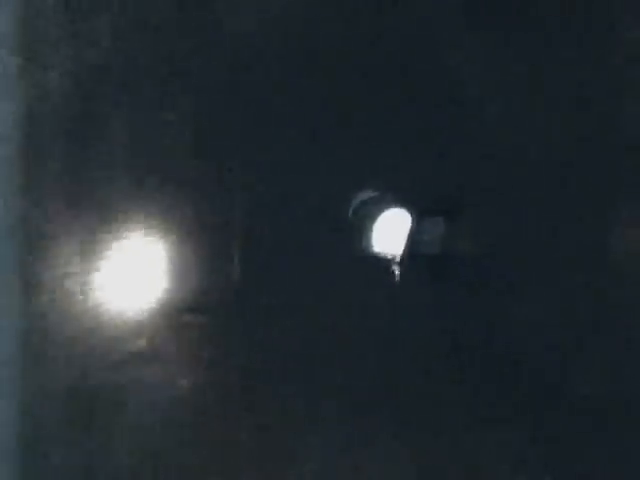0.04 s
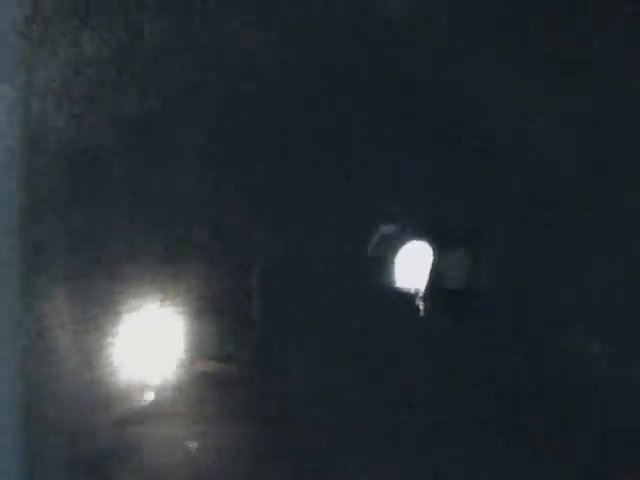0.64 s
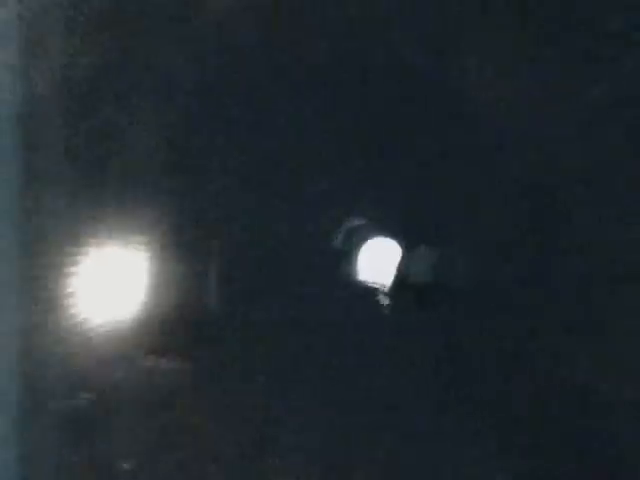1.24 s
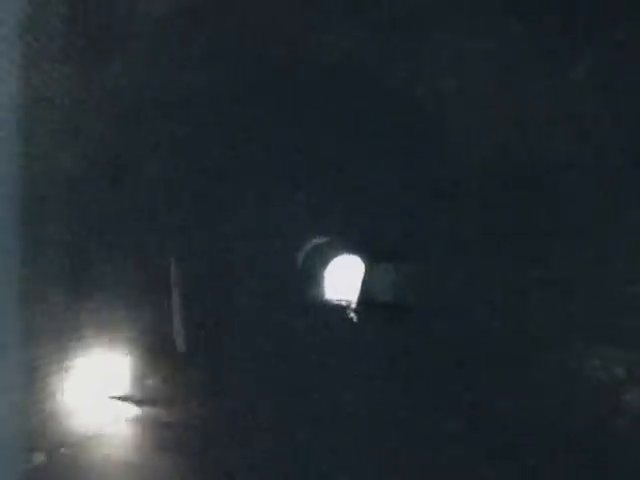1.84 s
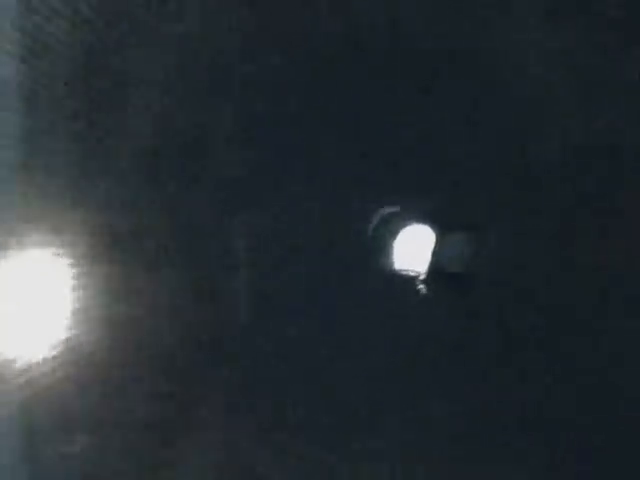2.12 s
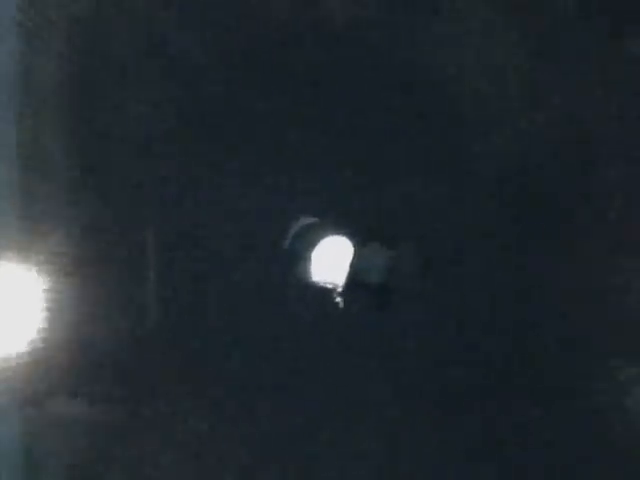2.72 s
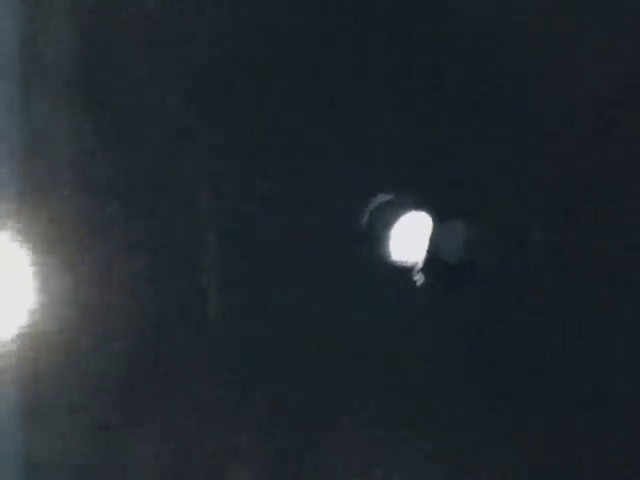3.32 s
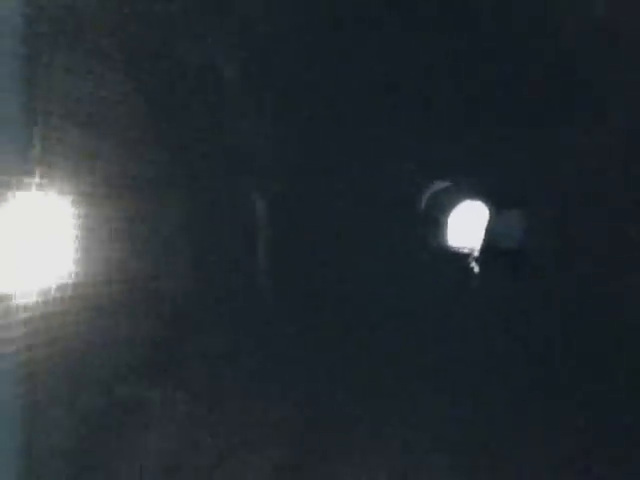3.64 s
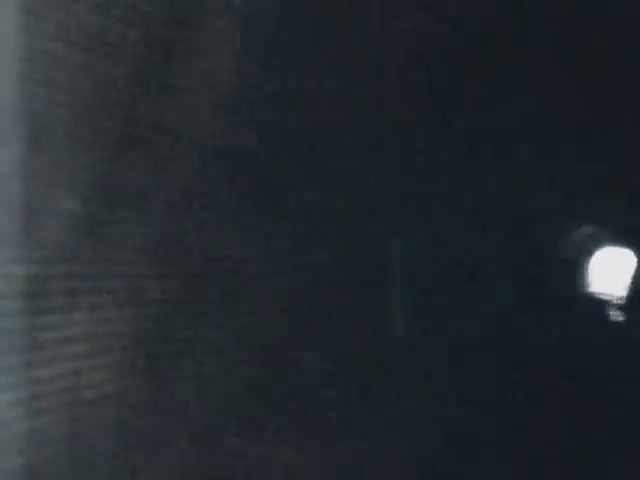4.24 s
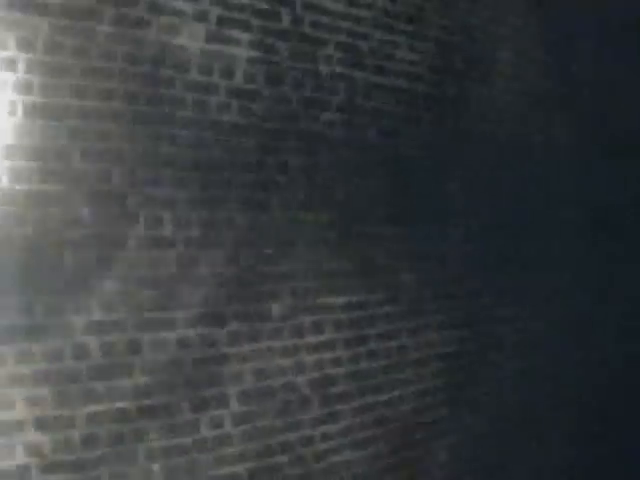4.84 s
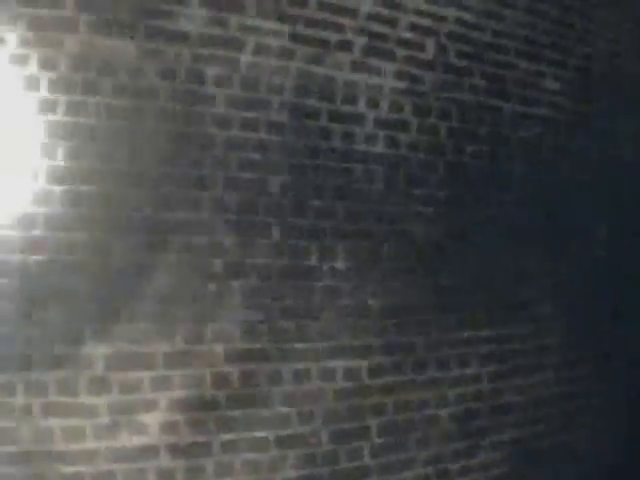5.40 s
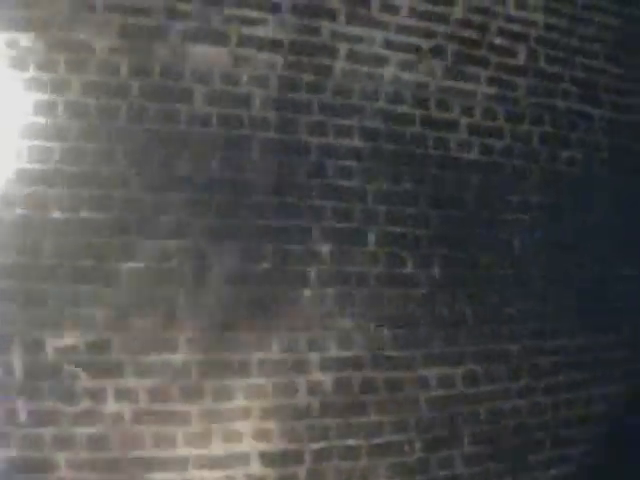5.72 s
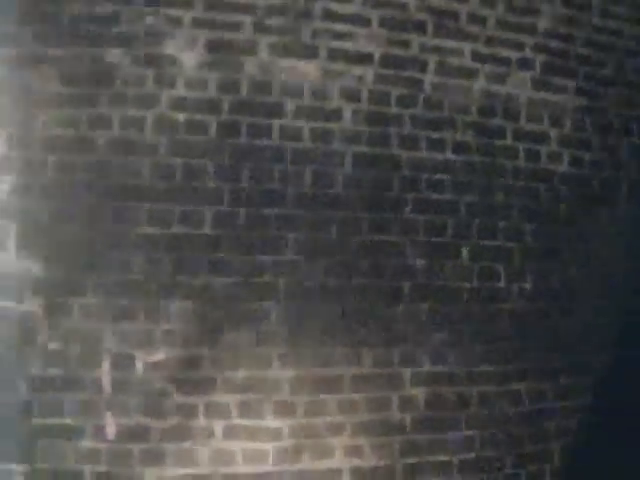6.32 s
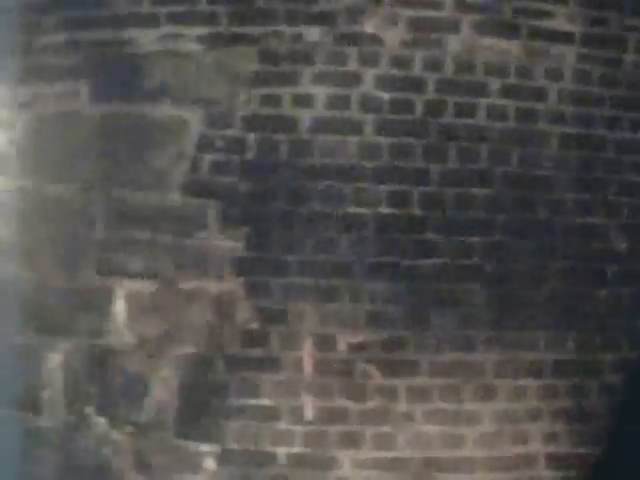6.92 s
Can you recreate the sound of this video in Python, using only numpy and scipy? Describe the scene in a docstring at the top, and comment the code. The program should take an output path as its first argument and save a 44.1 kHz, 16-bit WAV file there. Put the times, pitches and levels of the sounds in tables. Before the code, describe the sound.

Crunchy footsteps on loose stones echo in a hollow brick tunnel, then stop and give way to faint shuffles.

```python
"""In a long brick tunnel, someone walks over loose stones, then stops and shuffles on the spot.
Each step grinds grit, knocks stones together and thumps the ground. Now and then a brick rocks or a
shard rings; dull tocks and the clack of loose carried gear recur with the walk. The arched roof
answers with a hollow echo, over a faint draught and a camera's hiss and thin whine."""
import sys
import numpy as np
from scipy import signal
from scipy.fft import rfft, irfft, next_fast_len
from scipy.io import wavfile
from scipy.ndimage import map_coordinates

SR = 44100
rng = np.random.default_rng(int(sys.argv[2]) if len(sys.argv) > 2 else 0)


def bounce(signal):
    """Save signal as a 16-bit WAV file at the path given by the first command-line argument."""
    frames = np.transpose(np.atleast_2d(signal))
    limited = np.clip(frames, -1, 1)
    pcm = np.round(limited * 32767).astype(np.int16)
    wavfile.write(sys.argv[1], SR, pcm)


N = 311346
TOP_HZ = 12850

# Levels compare rows within a table. A fade_s is the time to die away by 60 dB.
# tone of the draught and hiss: pitch_hz, level_db
DRAUGHT_TONE = [(25, -65), (95, -20), (240, -21), (390, -14), (800, -7), (1700, -8), (3400, -11.5),
                (8000, -19), (13000, -23.5)]
# whine of the camera's electronics: pitch_hz, level_db
WHINE = [(8118, -78.5), (8146, -79), (11799, -83)]
# how long the tunnel echoes: pitch_hz, fade_s
ECHO_FADES = [(150, 7.8), (800, 1.46), (2000, 0.8), (4000, 1.64), (12000, 0.47)]
# how strongly the walls reflect: pitch_hz, level_db
WALL_TONE = [(100, -37), (400, -9.5), (800, -5), (2000, -5), (4000, -6.5), (12000, 0)]
# faint clinks far down the tunnel: start_s, level_db, pitch_hz
CLINKS = [(5.548, -35, 1663), (5.776, -38, 1610)]
# clacks of the loose gear: start_s, level_db
CLACKS = [(1.174, -13), (1.839, -11), (2.42, -10.5), (3.107, -14.5), (3.784, -11), (4.458, -19.5)]
# notes the gear rings with: pitch_hz, level_db, fade_s
GEAR_NOTES = [(800, -3, 0.013), (1758, -1.5, 0.0095), (1738, 3.5, 0.016), (2028, 1.5, 0.02),
              (2480, -1, 0.0093), (3670, -3, 0.0064)]
# sprays of fine sand: start_s, level_db, length_s
SPRAYS = [(.205, -49.5, 0.012), (0.997, -43.5, 0.0084), (4.948, -58.5, 0.014), (5.789, -58.5, 0.0098)]
# thin hiss of that sand: pitch_hz, level_db
SAND_TONE = [(1500, -24), (4000, 3.5), (5500, 0.5), (8000, -7), (13000, -12)]
# weight landing on the ground: start_s, level_db
THUMPS = [(0.47, -43), (.652, -40.5), (1.038, -26), (1.208, -24.5), (1.779, -33), (1.798, -29),
          (2.399, -36), (3.494, -39), (4.618, -44), (5.11, -47.5), (5.369, -56), (5.445, -51.5),
          (6.161, -52), (6.581, -50), (6.989, -47.5)]
# dull tone of a sole on the ground: pitch_hz, level_db
SOLE_TONE = [(30, -27), (90, -14.5), (140, -11), (200, 1), (285, -1), (350, 5), (480, -2.5), (900, -5.5),
             (2000, -64)]
# loose bricks rocking: start_s, level_db, lowest_pitch_hz
BRICKS = [(4.271, -20, 809), (4.313, -25.5, 778), (4.461, -25, 664)]
# notes of a brick: times_lowest_pitch, level_db, fade_s
BRICK_NOTES = [(1, 2.5, 0.049), (1.78, -2.5, 0.048), (1.92, -1.5, 0.072), (3.1, -8, 0.017)]
# bright crack of a hard blow: pitch_hz, level_db
CRACK_TONE = [(100, -36), (400, -26), (1200, 0), (2400, 1.5), (3600, -0.5), (4700, -10.5), (7500, -17),
              (13000, -22)]
# hard, flat shards struck underfoot: start_s, level_db, rattle_s
SHARDS = [(1.136, -8, 0.016), (2.992, -8.5, 0.024), (3.582, -10, 0.027), (3.606, -16, 0.051),
          (4.314, -11, .04)]
# notes of a shard: pitch_hz, level_db, fade_s
SHARD_NOTES = [(1370, 14.5, 0.051), (2080, 7.5, 0.047), (2420, 10, 0.024), (3300, 0, 0.035),
               (3760, -1, 0.031), (5050, -14, 0.03)]
# grit snapping close by: start_s, level_db
SNAPS = [(0.517, -15.5), (0.59, -17.5), (.745, -27), (.767, -19.5), (1.009, -25), (1.182, -15),
         (1.199, -21), (1.208, -7), (1.708, -13), (1.803, -15), (1.945, -16), (1.99, -25), (2.365, -18.5),
         (2.399, -24), (2.411, -13), (3.005, -22), (3.231, -18), (3.495, -16), (3.745, -18.5), (3.799, -16),
         (4.405, -25.5), (4.577, -19), (4.659, -20.5), (5.11, -28.5), (5.116, -23.5)]
# tone of a snap: pitch_hz, level_db
SNAP_TONE = [(30, -7), (110, -47), (200, -1), (500, -2.5), (1100, 4.5), (2600, 6), (4500, -6), (7000, -14),
             (13000, -23)]
# dull, hollow tocks close by, recurring with the stride: start_s, level_db
TOCKS = [(.169, -15.5), (0.4425, -20), (.561, -13), (.571, -18), (0.7544, -12), (1.109, -15.5),
         (1.321, -18.5), (1.633, -24), (1.763, -15), (2.178, -27), (2.375, -14), (2.575, -29), (3.214, -13),
         (3.731, -12), (4.642, -20)]
# dull ring of a tock: pitch_hz, level_db
TOCK_TONE = [(150, -27), (500, -28), (820, 1.5), (1500, 1), (2100, -16), (6000, -36.5)]
# loose stones knocking together: start_s, level_db, pitch_hz, rattle_s, crack_db
KNOCKS = [(0.468, -27.5, 1130, 0.013, -4), (0.579, -16, 1370, 0.041, -6.5), (0.621, -14.5, 1700, .018, -24),
          (0.633, -18, 1280, 0.013, -17), (.835, -22, 1610, 0.055, -12), (1.038, -8, 960, 0.0081, -8.5),
          (1.098, -9.5, 1290, 0.034, -16.5), (1.208, -11, 1430, 0.027, -5), (1.257, -23, 2730, 0.02, 4),
          (1.803, -16.5, 800, 0.022, -1.5), (1.83, -17.5, 1840, 0.026, -4), (1.864, -21, 2160, 0.016, -15),
          (1.894, -19, 710, .03, -18), (1.949, -16.5, 1030, 0.02, -18), (2.137, -29, 1410, 0.018, -23),
          (2.255, -35, 1670, .012, 5), (2.493, -22, 990, 0.0097, -1.5), (2.695, -33, 1870, 0.0096, -50),
          (2.811, -25.5, 1850, 0.011, -22), (3.143, -25.5, 890, .015, -4), (3.18, -21.5, 2010, 0.088, -15),
          (3.526, -24.5, 970, 0.052, -17), (3.843, -22, 1240, 0.04, -23), (3.951, -25, 1510, 0.042, -16),
          (4.126, -28, 1620, 0.011, -9), (4.151, -28.5, 1620, 0.022, -10), (4.239, -28, 1030, 0.03, -5.5),
          (4.321, -25.5, 1250, 0.085, -26), (4.848, -28, 994, 0.037, -11.5),
          (5.153, -28.5, 1340, 0.035, -15), (5.394, -36.5, 870, 0.016, -8), (5.546, -35.5, 1500, 0.021, -7),
          (6.160, -35.5, 1990, 0.025, -9), (6.582, -34, 1970, 0.048, -7), (6.607, -31.5, 1230, 0.025, -15),
          (6.686, -37.5, 970, .018, -6), (6.779, -40, 675, 0.05, -15), (6.99, -29.5, 2250, .03, -25)]
# footfalls about 0.6 s apart, then two shuffles: full_weight_s, grit_db, sole_db, rise_s, settle_s
STEPS = [(0.0, -33, -50, 0.13, 0.26), (0.575, -31, -49, 0.13, 0.18), (1.21, -31, -53, 0.23, 0.25),
         (1.795, -30, -46.5, 0.19, 0.25), (2.425, -35.5, -53, 0.13, 0.17), (3.009, -32, -48.5, 0.16, 0.29),
         (3.809, -34.5, -54, 0.12, 0.21), (4.34, -38, -81, 0.15, 0.3), (4.61, -39.5, -60, 0.19, 0.45),
         (6.52, -48, -72, 0.34, 0.18), (6.98, -49.5, -64.5, 0.22, 0.13)]
# gravel giving way as a heel lands or a toe pushes off: start_s, level_db, length_s
SLIDES = [(0.196, -41, 0.037), (0.342, -44, 0.2), (0.734, -41.5, 0.12), (0.896, -45, 0.096),
          (0.997, -38, 0.048), (1.125, -38.5, 0.08), (1.262, -36.5, 0.044), (1.385, -42, 0.063),
          (1.536, -43, 0.11), (1.92, -43.5, 0.082), (1.975, -45, 0.16), (2.367, -32.5, 0.0085),
          (2.52, -38, .02), (2.612, -40, 0.023), (2.794, -43, 0.024), (3.176, -43.5, 0.11),
          (3.3, -49, 0.17), (3.579, -40.5, 0.19), (3.947, -42, 0.059), (4.906, -51.5, 0.049)]
# grit trickling between steps, less once the walker stands: time_s, level_db
TRICKLE = [(0, -51), (4.2, -50), (5.2, -58), (5.95, -62), (7.05, -55)]
# tone of grinding gravel: pitch_hz, level_db
GRAVEL_TONE = [(50, -38), (120, -19.5), (300, -15), (370, -34), (470, -7.5), (650, -3.5), (860, -1),
               (1450, 1), (2600, -4), (4000, -16), (8000, -27.5), (13000, -31)]


def amp(db):
    """Turn decibels into a number to multiply by."""
    return 10 ** (np.asarray(db) / 20)


def unit(x):
    """Scale a sound to an average power of 1."""
    return x / np.sqrt(np.mean(x ** 2) + 1e-20)


def peaked(x):
    """Scale a sound so its biggest swing is 1."""
    return x / np.abs(x).max()


def along(points, hz):
    """Read a table of (pitch, value) rows at any pitch in between."""
    pitches, values = np.transpose(points)
    return np.interp(np.log(hz + 1), np.log(pitches), values)


def wobble(rate):
    """A smooth curve through `rate` random values a second."""
    return map_coordinates(rng.standard_normal(int(N * rate / SR) + 4), [np.arange(N) * rate / SR])


def add(track, start_s, sound):
    """Mix a sound into a track."""
    part = track[max(round(start_s * SR), 0):][:len(sound)]
    part += sound[:len(part)]


def click(tone, size=4096):
    """A click with the given tone."""
    cepstrum = irfft(np.log(amp(along(tone, np.fft.rfftfreq(size, 1 / SR)))))
    # folding the second half onto the first packs the energy at the click's start
    cepstrum[1:size // 2] *= 2
    cepstrum[size // 2 + 1:] = 0
    return irfft(np.exp(rfft(cepstrum)))


def coloured(x, tone):
    """Filter a sound to give it a tone."""
    return signal.fftconvolve(x, click(tone))[:len(x)]


def hiss(tone):
    """Steady noise with the given tone."""
    return unit(coloured(rng.standard_normal(N), tone))


def fade(t, fade_s):
    """Die away by 60 dB in fade_s."""
    return np.exp(-np.log(1000) * t / np.maximum(fade_s, 1e-4))


def rattle(t, rattle_s, bounces_per_s=2000):
    """One blow, then tiny bounces that die away."""
    bounces = rng.random(len(t)) < bounces_per_s / SR
    blows = amp(-8.5) * bounces * rng.standard_normal(len(t)) * fade(t, 1.8 * rattle_s)
    blows[0] = 1
    return blows


def slip(t, length_s, rise_s=0.0051, fall_s=0.017):
    """Loose ground starts to move at t = 0, runs for a while and comes to rest."""
    return np.exp(-np.maximum(np.maximum(-t / rise_s, (t - length_s) / fall_s), 0))


def grains(per_s, hz, spread, cycles, scatter_db, size=200):
    """Tiny stones tick at random times, pitches and strengths, each ringing for a few cycles."""
    count = int(per_s * N / SR)
    start = rng.integers(0, N, (count, 1))
    pitch = np.clip(hz * np.exp(spread * rng.standard_normal((count, 1))), hz / 2, TOP_HZ)
    strength = amp(scatter_db * np.minimum(rng.exponential(size=(count, 1)), 3))
    turns = pitch * np.arange(size) / SR
    ticks = strength * rng.choice([-1, 1], (count, 1)) * np.sin(2 * np.pi * turns) * fade(turns, cycles)
    track = np.bincount((start + np.arange(size)).ravel(), ticks.ravel(), N)[:N]
    # small stones give off hardly any bass
    return unit(signal.sosfilt(signal.butter(2, hz / 2, "high", fs=SR, output="sos"), track))


def draught_and_whine():
    """Faint moving air, with the camera's hiss and thin whine."""
    t = np.arange(N) / SR
    whine = sum(amp(db) * np.sin(2 * np.pi * hz * t + 0.4 * wobble(5)) for hz, db in WHINE)
    return amp(-61) * hiss(DRAUGHT_TONE) + whine


def tunnel_echo(sound, spots=6):
    """The bricks echo, the bass longest; one echo blends into the next as the walker moves along."""
    echo = np.zeros(N)
    for spot in range(spots):
        hz, t, bands = signal.stft(rng.standard_normal(SR), SR, nperseg=256)
        bands = bands * fade(t, along(ECHO_FADES, hz)[:, None]) * (1 - np.exp(-t / 0.0089))
        tail = signal.istft(bands, SR, nperseg=256)[1]
        tail = coloured(tail / np.linalg.norm(tail), WALL_TONE)
        nearness = np.maximum(1 - np.abs(np.linspace(0, spots - 1, N) - spot), 0)
        echo += signal.fftconvolve(sound * nearness, tail)[:N]
    return echo


def far_clinks():
    """Far away, a small stone gives a soft, short ring."""
    out, t = np.zeros(N), np.arange(SR) / SR
    for start_s, db, hz in CLINKS:
        add(out, start_s, amp(db) * peaked(np.sin(2 * np.pi * hz * t) * t * fade(t, 0.009)))
    return out


def gear_clacks(size=4096):
    """The loose piece of gear strikes, then bounces once a few milliseconds later."""
    out, t = np.zeros(N), np.arange(size) / SR
    for start_s, db in CLACKS:
        ring = sum(amp(note_db + rng.normal()) * np.sin(2 * np.pi * hz * rng.normal(1, 0.012) * t)
                   * fade(t, fade_s) for hz, note_db, fade_s in GEAR_NOTES)
        clack = peaked(ring * (1 - np.exp(-t / 0.00057)))
        add(out, start_s, amp(db - 0.5) * clack)
        add(out, start_s + rng.uniform(0.00358, 0.0091), amp(db - 8) * clack)
    return out


def sand_sprays():
    """Fine sand skitters away from a boot."""
    t = np.arange(N) / SR
    flow = sum(amp(db) * slip(t - start_s, length_s) for start_s, db, length_s in SPRAYS)
    return flow * hiss(SAND_TONE)


def ground_thumps(size=4096):
    """The packed ground answers the walker's weight with a short, low push."""
    out, t = np.zeros(N), np.arange(size) / SR
    for start_s, db in THUMPS:
        thump = coloured(rng.standard_normal(size) * fade(t, 0.028), SOLE_TONE)
        add(out, start_s, amp(db + 5) * peaked(thump))
    return out


def rocking_bricks(size=8192):
    """A rocking brick rings hollow under a short crack."""
    out, t = np.zeros(N), np.arange(size) / SR
    for start_s, db, hz in BRICKS:
        ring = sum(amp(note_db + rng.normal()) * np.sin(2 * np.pi * (hz * ratio * t + rng.random()))
                   * fade(t, fade_s) for ratio, note_db, fade_s in BRICK_NOTES)
        ring *= 1 - np.exp(-t / 0.00087)  # soften the start
        crack = coloured(rng.standard_normal(size) * fade(t, 0.047), CRACK_TONE)
        add(out, start_s, amp(db + 1.5) * (peaked(ring) + amp(-7) * peaked(crack)))
    return out


def ringing_shards(size=4096):
    """A brittle shard snaps, sounds all its bright notes at once and chatters briefly."""
    out, t = np.zeros(N), np.arange(size) / SR
    crack = amp(6.5) * peaked(click(CRACK_TONE, size))
    for start_s, db, rattle_s in SHARDS:
        ring = sum(amp(note_db + rng.normal()) * np.sin(2 * np.pi * hz * rng.normal(1, 0.023) * t)
                   * fade(t, fade_s) for hz, note_db, fade_s in SHARD_NOTES)
        chatter = signal.fftconvolve(rattle(t, rattle_s), np.diff(ring, prepend=0))[:size]
        add(out, start_s, amp(db) * peaked(peaked(chatter) + crack))
    return out


def grit_snaps(size=512):
    """Brittle grit breaks in a single swing of pressure and crumbles for an instant."""
    out, t = np.zeros(N), np.arange(size) / SR
    # delaying some pitches a little turns the push into a push and a pull
    swing = signal.lfilter([-0.6, 1], [1, -0.6], click(SNAP_TONE))
    for start_s, db in SNAPS:
        crumble = (t == 0) + amp(-13) * rng.standard_normal(size) * fade(t, 0.0041)
        add(out, start_s, amp(db + 1.5) * peaked(signal.fftconvolve(crumble, swing)))
    return out


def hollow_tocks():
    """A dull tock swings two or three times and is still."""
    out = np.zeros(N)
    for start_s, db in TOCKS:
        tuning = rng.normal(1, 0.018)
        tock = click([(hz * tuning, level_db) for hz, level_db in TOCK_TONE])
        add(out, start_s, amp(db - 4) * peaked(tock))
    return out


def stone_knocks(size=4096):
    """A blow and its tiny bounces sound four short, hollow notes; a hard blow also cracks."""
    out, t = np.zeros(N), np.arange(size) / SR
    for start_s, db, hz, rattle_s, crack_db in KNOCKS:
        pitches = hz * np.array([[0.7], [1], [1.38], [2.1]]) * np.exp(0.12 * rng.standard_normal((4, 1)))
        turns = pitches * t
        strengths = amp(np.array([-4, 5, 5, -6]) + 1.8 * rng.standard_normal(4)) * [1, -1, 1, -1]
        notes = strengths @ (np.cos(2 * np.pi * turns) * fade(turns, 7))  # each lasts 7 cycles
        ring = signal.fftconvolve(rattle(t, rattle_s), notes)[:size]
        # the contact is soft enough to dull the ring
        ring = signal.lfilter(*signal.butter(2, min(1.83 * hz, TOP_HZ), fs=SR), ring)
        crack = coloured(rng.standard_normal(size) * fade(t, rattle_s) + 9 * (t == 0), CRACK_TONE)
        add(out, start_s, amp(db) * (amp(-2) * peaked(ring) + amp(crack_db + 3) * peaked(crack)))
    return out


def tread(t, rise_s, settle_s, swing_db=24, roundness=1.244):
    """Weight comes onto a foot until t = 0, lingers, then eases off."""
    return amp(-swing_db * np.maximum(-t / rise_s, t / settle_s) ** roundness)


def footwork(sole_lag_s=0.017, sole_stretch=1.53):
    """Steps, slides and trickle add up to two loudness curves in dB: grinding grit and dragging soles."""
    t = np.arange(N) / SR
    grit_power = amp(np.interp(t, *np.transpose(TRICKLE))) ** 2
    grit_power += sum((amp(db) * slip(t - start_s, length_s)) ** 2 for start_s, db, length_s in SLIDES)
    sole_power = grit_power * amp(-19.5) ** 2
    for full_weight_s, grit_db, sole_db, rise_s, settle_s in STEPS:
        grit_t = t - full_weight_s
        sole_t = (grit_t - sole_lag_s) / sole_stretch  # the sole drags later and longer
        grit_power += (amp(grit_db) * tread(grit_t, rise_s, settle_s)) ** 2
        sole_power += (amp(sole_db) * tread(sole_t, rise_s, settle_s)) ** 2
    return 10 * np.log10(grit_power), 10 * np.log10(sole_power)


def boot_crunch():
    """Under the boot, grit slips in clumps, pebbles click, stray stones knock and the sole scuffs."""
    grind_db, scuff_db = footwork()
    weight_db = grind_db - grind_db.max()  # 0 at the heaviest moment
    clumps_db = 2.13 * wobble(70)
    gravel = hiss(GRAVEL_TONE)
    pebbles = grains(per_s=170, hz=1454, spread=0.46, cycles=7.7, scatter_db=2.5, size=400)
    splinters = grains(per_s=180, hz=3620, spread=0.54, cycles=5.3, scatter_db=8)
    splinters *= amp(0.27 * weight_db)  # heavy steps splinter the grit most
    strays = grains(per_s=32, hz=1600, spread=0.4, cycles=7.7, scatter_db=5, size=600)
    strays *= amp(-42.5 + 0.79 * weight_db)  # they roll on, so they stand out between steps
    grit = amp(grind_db + clumps_db) * (amp(-2) * gravel + amp(-4.5) * pebbles + amp(-14.5) * splinters)
    scuff = amp(scuff_db + clumps_db + 4.1 * wobble(30) + 1) * hiss(SOLE_TONE)
    return grit + strays + scuff


def scene():
    """Crunching and ringing fill the tunnel; close knocks echo little, and far clinks are only echo."""
    crunch = boot_crunch() + sand_sprays()
    ringing = rocking_bricks() + ringing_shards()
    knocks = stone_knocks() + hollow_tocks() + grit_snaps() + ground_thumps() + gear_clacks()
    direct = amp(-0.18) * crunch + amp(0.87) * (knocks + ringing)
    echo = tunnel_echo(amp(-11) * crunch + amp(-12) * ringing + amp(-18) * knocks + far_clinks())
    return (direct + echo + draught_and_whine())[None]


def record(dry):
    """The camera cuts off the treble above TOP_HZ."""
    size = next_fast_len(N + SR // 4)
    hz = np.fft.rfftfreq(size, 1 / SR)
    passed = np.clip((TOP_HZ - hz) / 200 + 0.5, 0, 1)
    return irfft(rfft(dry, size) * passed, size)[..., :N]


dry = scene()
out = record(dry)
bounce(out)
```